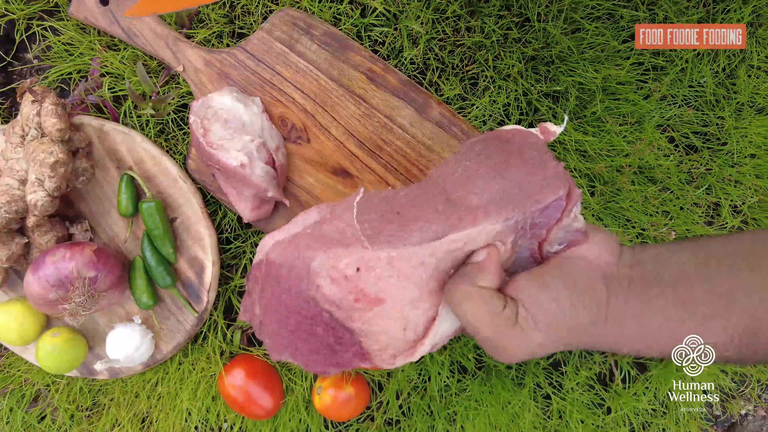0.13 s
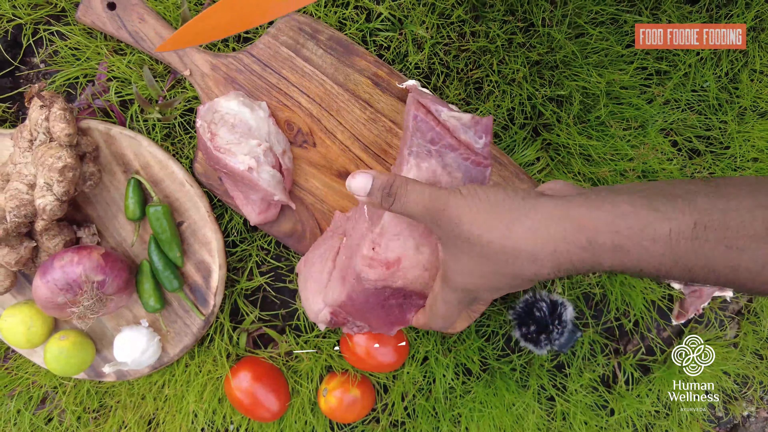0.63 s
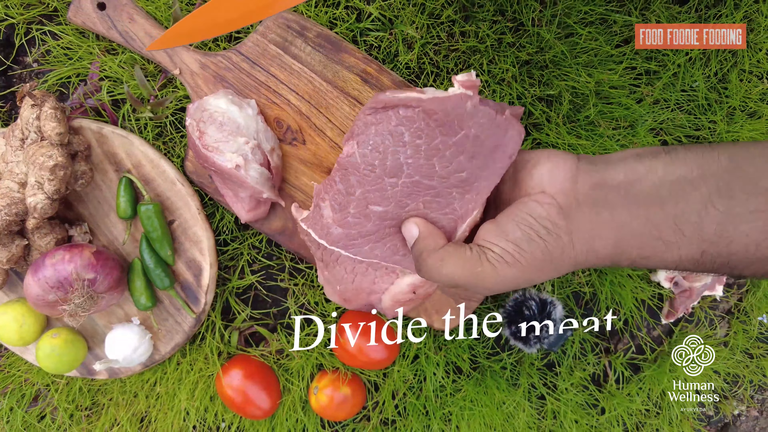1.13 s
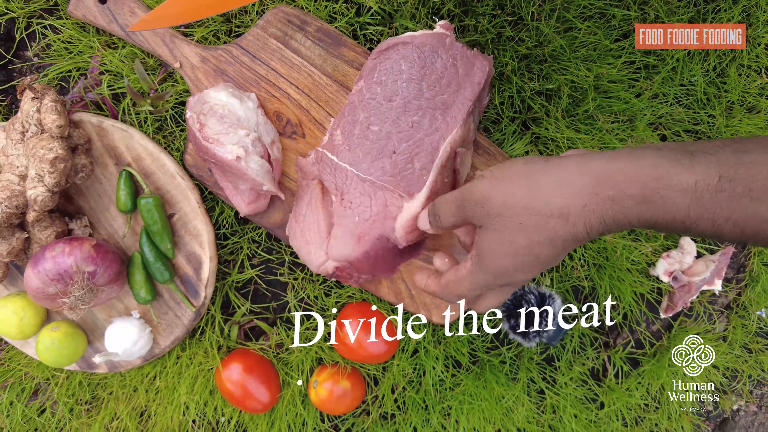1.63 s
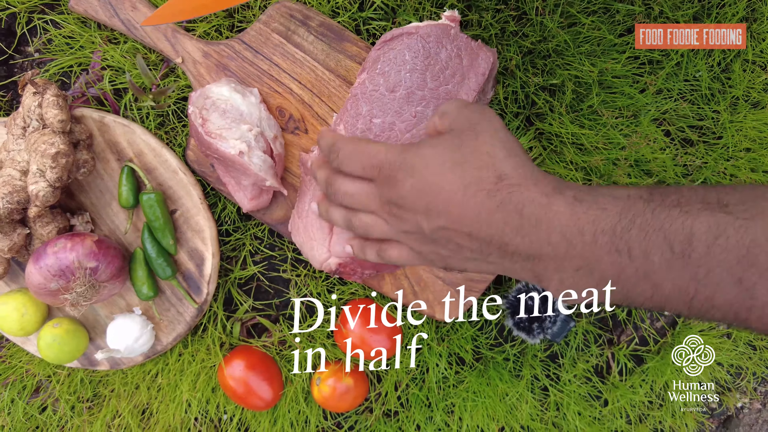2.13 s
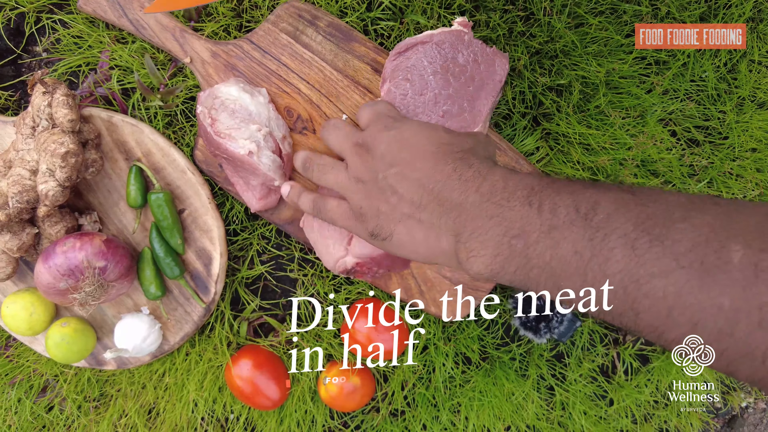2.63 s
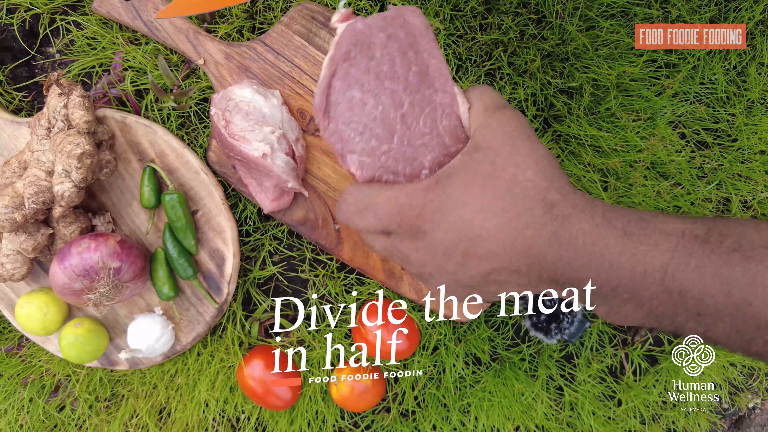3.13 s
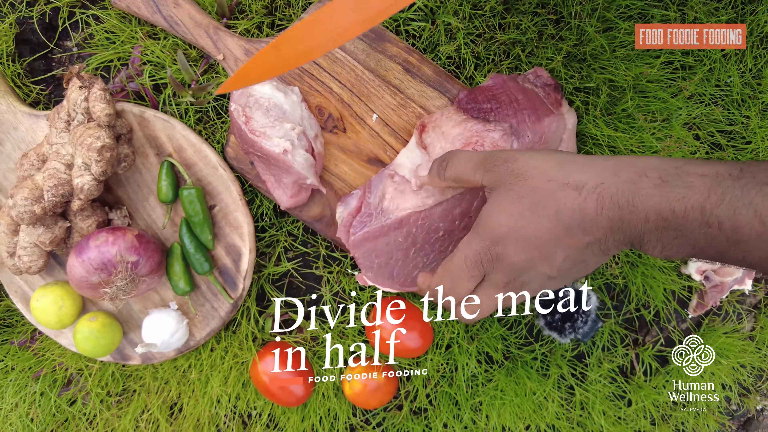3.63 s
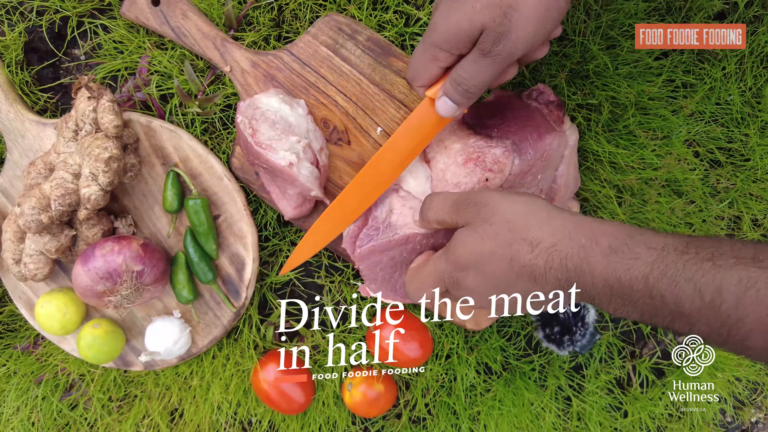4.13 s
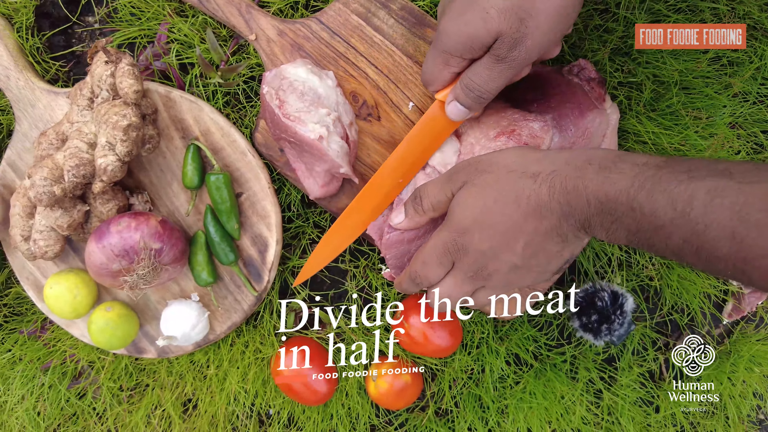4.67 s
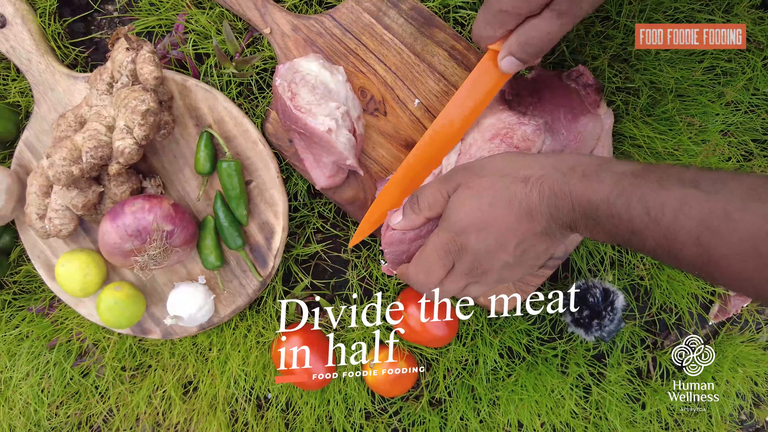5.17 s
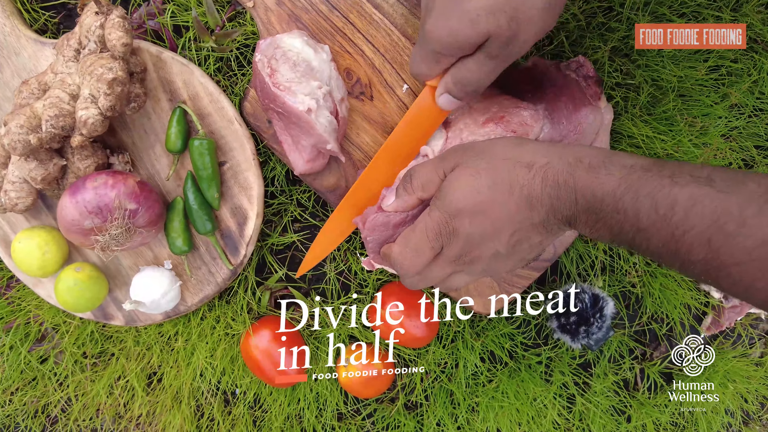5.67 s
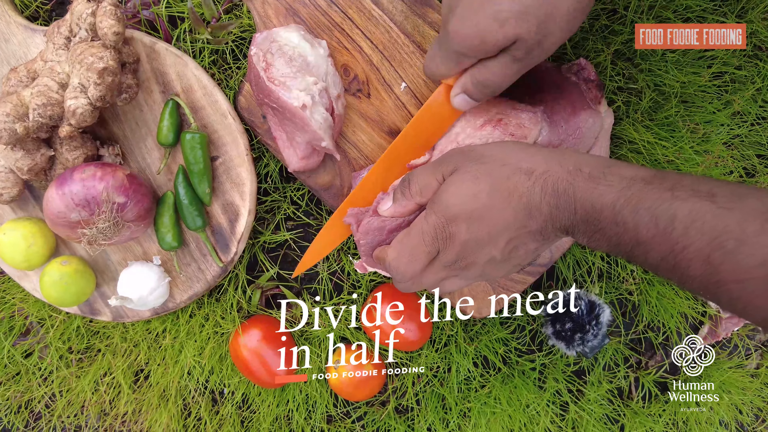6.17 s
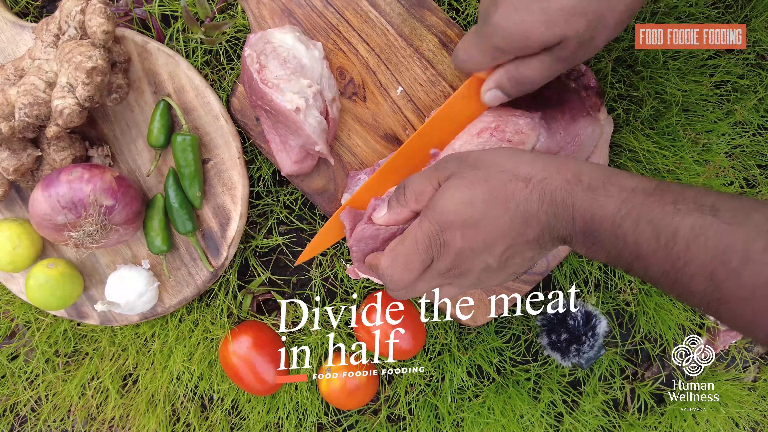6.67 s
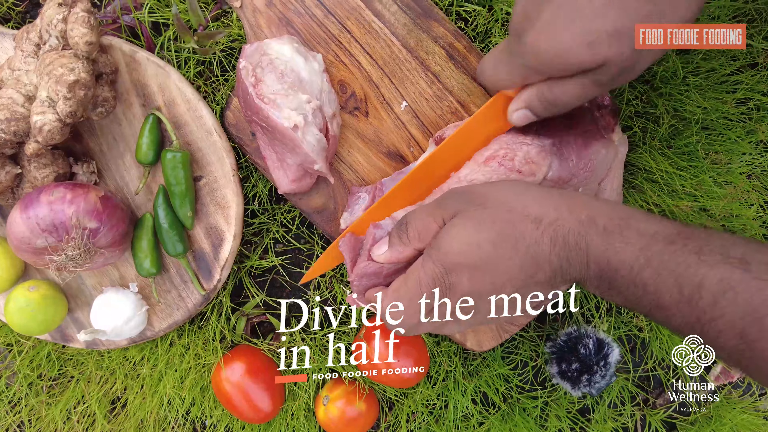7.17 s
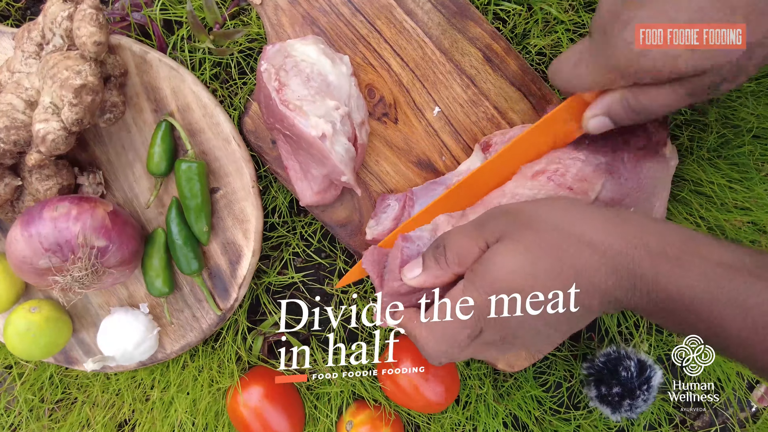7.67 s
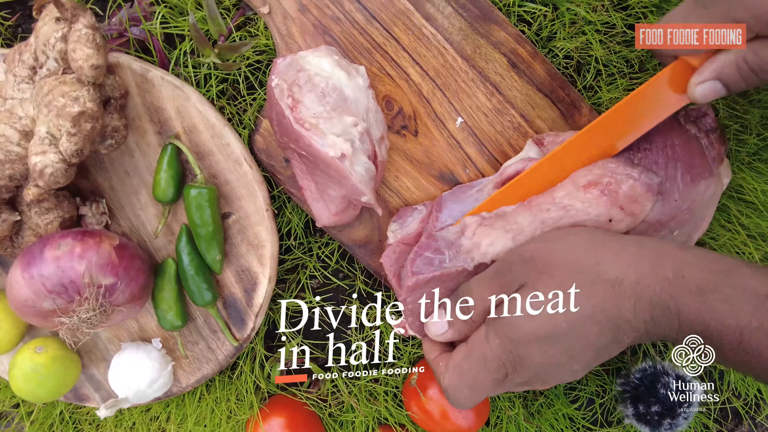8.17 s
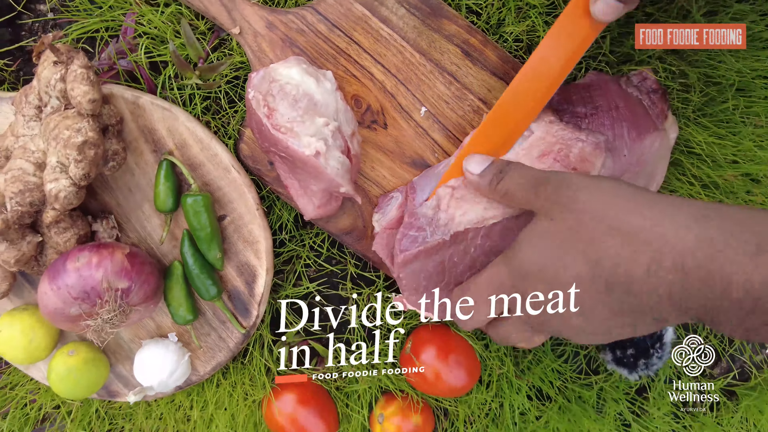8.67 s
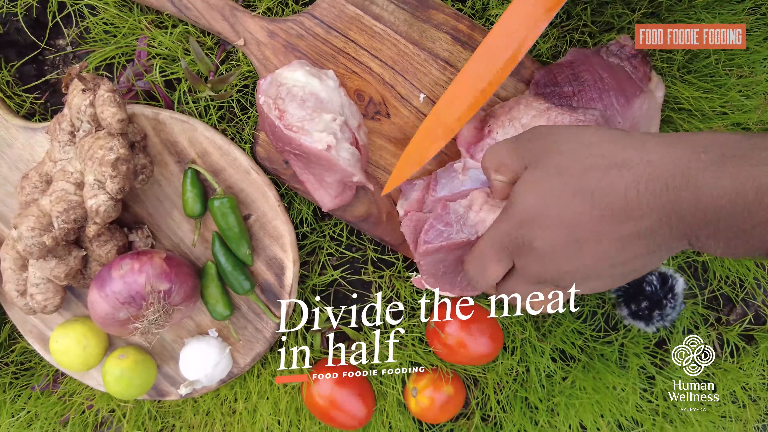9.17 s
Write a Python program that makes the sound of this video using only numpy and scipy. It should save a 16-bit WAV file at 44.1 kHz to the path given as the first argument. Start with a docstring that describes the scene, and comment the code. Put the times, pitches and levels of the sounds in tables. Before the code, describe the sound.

A quiet outdoor place, captured close to the cutting, with a soft high insect hiss and unsteady low rumble. From 0 to 4.3 seconds a knife saws through raw meat on a wooden board: long, thin, bright strokes, gritty and wet, with small ticks and snaps, strongest near 1.5 and 3.2 seconds. A cricket trills in pairs about every 0.9 seconds, each trill a rapid run of short falling tones with a brief echo; faint bird-like calls lie far behind. At 4.3 seconds the scene jumps. The cricket stops, soft knocks touch the board, and a distant engine drones low, rising slightly, with a wavering whine clearest around 7.6. After a lull, sharp crunchy cuts and clicks burst out at 5.8 to 6.2, continue in shorter strokes around 6.5 to 6.9, then cluster from 7.8 to 8.9, loudest near 8.5. Thin insect buzzes appear near 6.9 and after 8.

```python
"""An insect chorus hisses over distant rumble, and a cricket chirps in pairs: falling tones with echoes.
Close by, a knife saws and clicks through raw meat on a wooden board on a lawn: gritty friction noise
and short noise bursts excite shared resonances. The scene then jumps to a later moment: the cricket is
gone, a far engine drones in harmonic orders with a gear whine, and small insects buzz high up."""
import sys
import numpy as np
from scipy import signal
from scipy.fft import rfft, irfft
from scipy.io import wavfile
from scipy.ndimage import uniform_filter1d

SR = 44100
rng = np.random.default_rng(int(sys.argv[2]) if len(sys.argv) > 2 else 0)


def convert_level_to_amplitude(level_db):
    """Map a level in decibels to its linear amplitude factor."""
    exponent = np.asarray(level_db, float) / 20
    return 10 ** exponent


def bounce(signal):
    """Save signal as a 16-bit WAV file at the path given by the first command-line argument."""
    frames = np.transpose(np.atleast_2d(signal))
    limited = np.clip(frames, -1, 1)
    pcm = np.round(limited * 32767).astype(np.int16)
    wavfile.write(sys.argv[1], SR, pcm)


N = 410218
T = np.arange(N) / SR
JUMP_S = 4.281  # the scene jumps to a later moment


def unit(x):
    """Normalization: scale to rms 1."""
    return x / np.sqrt(np.mean(x ** 2))


def shape(x, points):
    """Minimum-phase filtering by (Hz, dB) points; the power of white noise is kept."""
    hz, db = np.transpose(points)
    grid_hz = np.linspace(1, SR / 2, 4097)
    log_gain = np.interp(np.log(grid_hz), np.log(hz), db) * np.log(10) / 20
    # folding the cepstrum onto positive times makes the response causal
    cepstrum = irfft(log_gain)
    cepstrum[1:4096] *= 2
    cepstrum[4097:] = 0
    response = irfft(np.exp(rfft(cepstrum)))
    return signal.fftconvolve(x, response / np.linalg.norm(response))[:N]


def curves(table):
    """Linear interpolation: columns of a table joined by straight lines in time."""
    s, *columns = np.transpose(table)
    return [np.interp(T, s, column) for column in columns]


def walk(rate_hz):
    """Slow random modulation: levels held for 1 / rate, smoothed twice, rms 1."""
    hold = int(SR / rate_hz)
    held = np.repeat(rng.standard_normal(N // hold + 1), hold)
    return unit(uniform_filter1d(uniform_filter1d(held, hold), hold)[:N])


def add(out, s, piece):
    """Superposition: mix a piece in at time s."""
    i = int(s * SR)
    out[i:i + len(piece)] += piece[:N - i]


# low rumble before and after the jump: start_s, deep_level_db, upper_level_db
RUMBLE_LEVELS = [
    [(0.0, -54, -73), (0.13, -50, -57.5), (0.39, -74, -68.5), (0.53, -55, -60), (1.38, -47, -62),
     (1.49, -58, -74), (2.12, -57.5, -58), (2.15, -52, -87), (2.47, -50, -58), (2.53, -57, -82),
     (2.58, -53, -64), (3.65, -51, -61.5), (3.98, -68, -66.5), (4.05, -52.5, -60), (4.14, -61, -72),
     (4.27, -49, -60)],
    [(4.29, -51, -45.5), (4.75, -62, -51), (4.86, -47, -43), (4.93, -38, -40.5), (5.0, -44, -45),
     (5.07, -56, -48.5), (5.35, -44, -42.5), (5.49, -52, -51), (5.77, -34.5, -43.5), (5.91, -39, -46),
     (5.99, -56, -51), (6.47, -59, -53), (6.58, -41, -51.5), (6.83, -60, -52.5), (6.89, -30, -51),
     (6.94, -65, -53), (7.29, -56, -55), (7.36, -50, -48), (7.75, -43, -49.5), (7.95, -38, -50),
     (8.07, -53, -49.5), (8.4, -51, -50.5), (8.87, -51, -50.5), (9.16, -60, -60), (9.27, -46, -55)],
]
# spectra of the deep and the upper rumble: frequency_hz, density_db
DEEP_SPECTRUM = [(12, -40), (22, -8), (40, -2), (58, 9.5), (72, -1), (100, -7), (140, -52)]
UPPER_SPECTRUM = [(50, -27), (85, 2), (130, -7.5), (200, -17.5), (300, -23), (400, -35.5), (600, -63)]


def rumble(later):
    """Band-shaped noise: two low bands whose levels vary independently."""
    before, after = (np.array(curves(part)) for part in RUMBLE_LEVELS)
    deep_db, upper_db = np.where(later, after, before)
    deep_gain = convert_level_to_amplitude(deep_db + 0.93 * walk(8.2))
    upper_gain = convert_level_to_amplitude(upper_db + 1.7 * walk(11.))
    deep = deep_gain * shape(rng.standard_normal(N), DEEP_SPECTRUM)
    upper = upper_gain * shape(rng.standard_normal(N), UPPER_SPECTRUM)
    return deep + upper


# spectra of air, leaves and insect chorus before and after the jump: frequency_hz, density_db
AIR_SPECTRA = ([(76, -21), (130, -3), (190, -10), (670, -19), (1110, -21.5), (2070, -24), (4200, -30.5),
               (5000, -27), (5800, -20.5), (7800, -20), (10400, -21), (11000, -28), (15000, -28),
               (15900, -30)], [(150, -24), (250, -1), (380, -13), (480, -11), (670, -17), (1270, -20),
               (2400, -23), (4300, -29.5), (5300, -26), (5950, -18), (8900, -19), (10500, -23),
               (11100, -28), (15900, -30)])
# level of that hiss before and after the jump: level_db
AIR_LEVELS = -63, -63.5


def air(later):
    """Stationary colored noise: air, leaves and insect chorus merge into one gently swelling hiss."""
    swell = convert_level_to_amplitude(.5 * walk(3.))
    before, after = [swell * convert_level_to_amplitude(level_db) * shape(rng.standard_normal(N), spectrum)
                     for spectrum, level_db in zip(AIR_SPECTRA, AIR_LEVELS)]
    return np.where(later, after, before)


# far engine: start_s, cycle_rate_hz, level_db, odd_orders_db, tilt_db (per order)
ENGINE_CURVES = [(4.29, 20.93, -56.5, -1, -1.5), (4.6, 20.87, -51.5, -3.5, -0.5),
                 (4.85, 20.94, -45, 1.5, -2.5), (5.35, 21.48, -50.5, -5.5, -1.54),
                 (5.6, 21.71, -39.5, -1, -3), (6.1, 22.31, -48, 3, -4), (6.35, 22.85, -45.5, -5, -5.5),
                 (6.6, 22.86, -46, -4.5, -2), (6.85, 23.05, -51, 0.5, -4), (7.15, 23.02, -52, -3.5, -2),
                 (7.35, 23.4, -46.5, -7, -2), (7.6, 23.45, -40, -12, -3), (7.85, 23.84, -44.5, -5.5, -2),
                 (8.1, 23.78, -48.5, -4.5, -3), (8.35, 24.2, -41.5, -13, -3), (8.6, 24.61, -53, -10, -2.5),
                 (8.85, 24.41, -49.5, -6.5, -3), (9.3, 24.27, -54.5, -2.5, -3.5)]
# exhaust color of orders 2 to 12, one value each: level_db
FIRING_COLOR = [0.5, 0.5, 1.5, 1.5, 0, -2, -3.5, 1.5, 0.5, -6, -1.5]


def engine_drone(phase):
    """Harmonic series of uneven firings; turbulent air lets each order swell and drift alone."""
    _, db, odd_db, tilt_db = curves(ENGINE_CURVES)
    drone = np.zeros(N)
    for order, firing_db in enumerate(FIRING_COLOR, 2):
        order_db = db + firing_db + (order % 2) * odd_db + (order - 2) * tilt_db
        order_db = order_db + 0.72 * walk(2.387)
        drift = 0.35 * walk(2.59) + 2 * np.pi * rng.random()
        drone += np.sqrt(2) * convert_level_to_amplitude(order_db) * np.sin(order * phase + drift)
    return drone


# gear whine: start_s, level_db
WHINE_LEVELS = [(4.29, -78), (5.1, -73), (6.4, -77), (7.1, -79), (7.3, -65.5), (7.48, -66), (7.62, -52),
                (7.76, -63.5), (7.84, -69.5), (8.26, -69), (8.33, -63), (8.58, -59.5), (8.68, -69),
                (8.82, -77), (9.0, -66.5), (9.08, -80), (9.3, -71)]


def gear_whine(phase):
    """Gear-mesh tone: a fixed multiple of the engine cycle, wobbling in phase and level."""
    mesh_order = 21.45  # whine cycles per engine cycle
    level_db, = curves(WHINE_LEVELS)
    level_db = level_db + 2.8 * walk(25.) + 1.3 * walk(8.)
    wobble = 1.1 * walk(30.) + 0.37 * walk(200.)
    return np.sin(mesh_order * phase + wobble) * convert_level_to_amplitude(level_db)


def engine():
    """Phase locking: drone and whine follow one engine cycle."""
    cycle_hz = curves(ENGINE_CURVES)[0]
    phase = 2 * np.pi * np.cumsum(cycle_hz) / SR
    return engine_drone(phase) + gear_whine(phase)


# faint sounds: calls of far birds and high insects, and a wide rustle at 1.4 s: start_s, length_s,
# start_pitch_hz, end_pitch_hz, width_hz, level_db
FAR_CALLS = [(0.19, 0.21, 1990, 1940, 197, -68.5), (0.376, 0.11, 1950, 1850, 300, -73),
             (1.4, .25, 3200, 2860, 1210, -69), (2.03, .07, 2550, 2499, 200, -72),
             (2.195, 0.19, 1880, 2690, 152, -73.5), (2.45, 0.064, 1970, 1940, 120, -74),
             (2.45, 0.086, 2150, 2190, 120, -75), (2.713, 0.13, 1260, 1250, 40, -75),
             (5.1, 0.14, 1890, 2010, 402.3, -77), (5.584, 0.14, 2030, 1970, 500, -73),
             (6.853, 0.15, 5300, 5300, 594, -66), (6.95, .22, 5350, 5250, 510, -70),
             (7.979, 0.17, 2340, 2340, 300, -73.5), (8.04, 0.1, 9740, 9700, 600, -66),
             (8.37, 0.11, 9700, 9750, 600.3, -68), (8.68, .13, 9840, 9700, 391.8, -63.5),
             (8.93, .08, 9400, 9500, 500.4, -63.5), (8.956, 0.1, 8986, 8985, 498, -68),
             (9.04, 0.1, 9878, 9750, 600, -64.5), (9.2, 0.13, 8840, 9020, 597, -68)]


def far_calls():
    """Narrow-band modulation: gliding tones whose size and phase flutter as fast as their width."""
    out = np.zeros(N)
    for s, length_s, from_hz, to_hz, width_hz, db in FAR_CALLS:
        n = int(length_s * SR)
        flutter_at = np.arange(n) / SR * width_hz
        in_phase, quadrature = (np.interp(flutter_at, np.arange(300), flutter)
                                for flutter in rng.standard_normal((2, 300)))
        phase = 2 * np.pi * np.cumsum(np.linspace(from_hz, to_hz, n)) / SR
        tone = in_phase * np.sin(phase) + quadrature * np.cos(phase)
        add(out, s, convert_level_to_amplitude(db) * np.hanning(n) ** .5 * tone)
    return out


# cricket chirps, in pairs: first_stroke_middle_s, level_db,
# first_stroke_db and last_stroke_db (both relative to the level)
CRICKET_CHIRPS = [(0.2195, -46, -11, -3), (.3735, -46.5, -2.5, 1.5), (1.1159, -42, -15, -16),
                  (1.2597, -49.5, 0, 2.5), (2.003, -47, -8, -1), (2.1597, -47, -3.5, 1),
                  (2.898, -46.5, -10, 0.5), (3.056, -45, -5, -8), (3.782, -46.5, -9, -1),
                  (3.9360, -46, -4.5, -2.5)]


def cricket():
    """Stridulation: each wing stroke is a short falling tone; strokes swell and fade through a chirp."""
    stroke_gap_s, from_hz, to_hz = .01145, 5570, 4754
    pitch_arch, pitch_sag = 0.019, 0.0065  # share the pitch arches over a chirp and sags to its end
    out = np.zeros(N)
    n = int(0.0088 * SR)  # one stroke
    glide_hz = np.linspace(from_hz, to_hz, n)
    for chirp, (s, db, first_db, last_db) in enumerate(CRICKET_CHIRPS):
        strokes = 8 - chirp % 2  # the second chirp of a pair is one stroke shorter
        for k, (late, size, bend) in enumerate(rng.standard_normal((strokes, 3))):
            arch = pitch_arch * np.sin(np.pi * k / (strokes - 1))
            sag = pitch_sag * k / strokes
            hz = glide_hz * (1 + 0.0072 * bend + arch - sag)
            tone = np.sin(2 * np.pi * np.cumsum(hz) / SR) * np.hanning(n) ** 0.83
            swell_db = first_db * np.exp(-k / 3.1) + last_db * np.exp(k + 1 - strokes) + 0.76 * size
            start_s = s - .0045 + k * stroke_gap_s + 0.00018 * late
            add(out, start_s, tone * convert_level_to_amplitude(db + swell_db))
    return out + nearby_echo(out)


def nearby_echo(x):
    """Diffuse reflection: things nearby return a decaying noise-like echo."""
    lag_s = np.arange(int(.06 * SR)) / SR
    echo = rng.standard_normal(len(lag_s)) * np.exp(-lag_s / .018) * (lag_s > .002)
    return convert_level_to_amplitude(-7.5) * signal.fftconvolve(x, echo / np.linalg.norm(echo))[:N]


# soft knocks and brushes on the board: start_s, level_db, decay_s
BOARD_KNOCKS = [(4.281, -55.5, .0015), (4.331, -59, 0.0024), (4.476, -63, .006), (4.494, -57, .002),
                (5.771, -57, .005), (5.79, -64, 0.024), (6.106, -60, .003), (7.6, -74, 0.041),
                (8.486, -65, 0.0031)]
# resonances of the board: frequency_hz, density_db
BOARD_SPECTRUM = [(150, -10), (400, -8), (1000, -4), (2000, -14), (3200, -3.5), (4500, -13), (6500, -49)]


def board_knocks():
    """Impact excitation: decaying noise bursts ring the wooden board."""
    out, t = np.zeros(N), np.arange(3000) / SR
    for s, db, decay_s in BOARD_KNOCKS:
        add(out, s, convert_level_to_amplitude(db) * rng.standard_normal(len(t)) * np.exp(-t / decay_s))
    return shape(out, BOARD_SPECTRUM)


# strokes of the blade: most_pressure_s, rise_s, fall_s, bright_hiss_db, dull_hiss_db
BLADE_STROKES = [(.40, .25, .11, -57, -65), (.70, 0.16, .18, -57.5, -68), (.96, 0.086, 0.093, -59.5, -68.5),
                 (1.52, 0.39, 0.15, -54, -65.5), (1.72, 0.14, 0.3, -56.5, -66),
                 (1.95, .3, 0.17, -59.5, -78), (2.39, 0.13, 0.17, -58, -66.5), (2.87, .04, .07, -71, -75),
                 (3.27, 0.12, 0.48, -54.5, -66.5), (3.5, 0.36, 0.065, -57, -64.5),
                 (3.78, 0.4, 0.63, -62.5, -65.5), (4.1, 0.15, .4, -69, -72), (4.3, .06, 0.18, -64, -76),
                 (4.48, 0.07, 0.1, -69, -70), (5.77, 0.1, 0.14, -54, -60), (5.9, 0.14, .09, -54.5, -58),
                 (6.13, 0.07, 0.085, -57.5, -61.5), (6.5, 0.088, 0.064, -59, -61.5),
                 (6.56, 0.041, 0.065, -55, -59.5), (6.79, 0.18, 0.091, -65, -64.5),
                 (6.94, 0.13, .08, -62, -66), (7.22, 0.36, 0.13, -69, -67), (7.56, 0.21, 0.29, -64, -63),
                 (7.82, 0.088, 0.085, -55.5, -59), (7.88, .06, 0.078, -59, -67),
                 (7.95, .06, 0.084, -60.5, -63), (8.17, 0.043, 0.065, -61, -63),
                 (8.23, 0.065, .08, -70, -65), (8.33, 0.08, 0.096, -55.5, -59),
                 (8.54, 0.066, .11, -50, -54.5), (8.89, .12, 0.13, -59.5, -62)]


def stroke_levels():
    """Power addition: each stroke climbs to its peak and falls away; overlapping strokes sum in power."""
    drop_db, roundness = 15, 1.49  # fall over the rise or fall time; 1 = pointed top, 2 = rounded
    rest_db = np.array([[-95], [-77]])  # bright, dull: hands and meat rustle between strokes
    power = convert_level_to_amplitude(rest_db) ** 2 * np.ones(N)
    for s, rise_s, fall_s, bright_db, dull_db in BLADE_STROKES:
        near = slice(max(int((s - 3 * rise_s) * SR), 0), int((s + 3 * fall_s) * SR))
        away = np.maximum((s - T[near]) / rise_s, (T[near] - s) / fall_s)
        fall_db = drop_db * away ** roundness
        power[0, near] += convert_level_to_amplitude(bright_db - fall_db) ** 2
        power[1, near] += convert_level_to_amplitude(dull_db - fall_db) ** 2
    return 10 * np.log10(power)


def friction():
    """Stick-slip friction of wet fibers: smooth noise plus dense tiny bursts of unequal size."""
    bursts_per_s, spread_db, smooth, tail_s = 250., 4.5, 1.55, 0.0019
    sizes = (rng.random(N) < bursts_per_s / SR) * convert_level_to_amplitude(spread_db * rng.standard_normal(N))
    gate = signal.lfilter([1], [1, -np.exp(-1 / (tail_s * SR))], sizes)
    grit = unit(rng.standard_normal(N) * (smooth + unit(gate)))
    return grit * convert_level_to_amplitude(2.27 * walk(30.))


def small_snaps(bright_db, dull_db):
    """Poisson process: small snaps at random moments, stronger where the stroke is stronger."""
    snaps_per_s, above_hiss_db, scatter_db = 16, 17.5, 2.5
    snaps = []
    s = rng.exponential(1 / snaps_per_s)
    while s < T[-1]:
        extra_dull, extra_bright = above_hiss_db + scatter_db * rng.exponential(size=2)
        i = int(s * SR)
        snaps.append((s, dull_db[i] + extra_dull, bright_db[i] + extra_bright))
        s += rng.exponential(1 / snaps_per_s)
    return snaps


def snap_burst():
    """Impulsive release: a sharp noise burst of unit energy."""
    t = np.arange(400) / SR
    burst = rng.standard_normal(len(t)) * (1 - np.exp(-t / .0001)) * np.exp(-t / 0.00082)
    return burst / np.linalg.norm(burst)


# loud fiber snaps and blade ticks: start_s, dull_energy_db, bright_energy_db
LOUD_CLICKS = [(.3663, -38, -35), (.622, -37, -34), (0.726, -52, -33), (1.4866, -43, -25),
               (1.5335, -50, -30), (1.6832, -44, -29), (2.8653, -50, -38), (3.1982, -34, -37),
               (3.202, -33, -36), (3.2491, -48, -39), (3.4397, -40, -36), (4.3018, -51, -31),
               (5.7088, -44, -35), (5.7462, -40, -24), (5.7696, -27, -28), (5.7728, -22.5, -18),
               (5.775, -27, -25), (5.7846, -23, -18), (5.811, -33, -32), (5.8137, -34, -23),
               (5.8411, -38, -28), (5.8777, -40, -26), (5.885, -38, -27), (5.9088, -31, -22.5),
               (6.1062, -36, -31), (6.1365, -34, -26), (6.1615, -38, -29), (6.4565, -40, -33),
               (6.4889, -34, -37), (6.5465, -31, -38), (6.556, -35, -31), (6.5844, -35, -31),
               (6.7852, -36, -38), (6.8702, -34, -36), (7.2108, -43, -37), (7.606, -36, -37),
               (7.8205, -27, -44), (7.851, -36, -36), (7.885, -48, -26), (7.925, -40, -32),
               (7.9649, -38, -38), (8.1624, -34, -27), (8.1771, -28, -33), (8.3146, -31, -40),
               (8.345, -32, -32), (8.486, -36, -27), (8.5292, -30, -18), (8.531, -35, -33),
               (8.543, -31, -27), (8.55, -34, -26), (8.572, -36, -37), (8.8431, -29.5, -32),
               (8.893, -34, -41), (8.8982, -29.5, -27.5), (8.9079, -35, -31), (8.9153, -40, -32),
               (8.9279, -36, -35)]
# resonances of blade and meat, dull and bright: frequency_hz, density_db
DULL_SPECTRUM = [(3000, -30.5), (4300, -19.5), (5500, -6), (6300, -4.5), (7600, -1), (9000, -10),
                 (10500, -29.5)]
BRIGHT_SPECTRUM = [(7500, -29), (9000, -8), (10600, -3.5), (12200, -7.5), (14900, -3), (15700, -9.5),
                   (17000, -16.5)]
# spectra of the scrape on wood and of the crunch: frequency_hz, density_db
WOOD_SPECTRUM = [(3000, -35), (4100, -18), (4700, -4.5), (5300, -1), (6200, -1.5), (8000, -28.5)]
CRUNCH_SPECTRUM = [(1500, -19), (2500, -30), (3200, 8), (4000, -1.5), (4800, -27), (6000, -46)]


def knife(later):
    """Source-filter principle: the blade hisses through fibers and snaps them; both ring the same resonances."""
    scrape_db, wood_snap_db = -4.5, -6  # scrape re dull hiss; wooden part of a snap re its dull part
    crunch_db, firm_db, crunch_slope = -75, -54.5, 2.2  # level at a firm bright hiss; dB per dB of it
    bright_db, dull_db = stroke_levels()
    rub_dull, rub_bright, rub_wood = friction(), friction(), friction()

    dull = rub_dull * convert_level_to_amplitude(dull_db)
    bright = (.5 * rub_dull + 0.48 * rub_bright) * convert_level_to_amplitude(bright_db)
    wood = rub_wood * convert_level_to_amplitude(dull_db + scrape_db)
    crunch = later * rub_wood * convert_level_to_amplitude(crunch_db + crunch_slope * (bright_db - firm_db))

    for s, dull_snap_db, bright_snap_db in LOUD_CLICKS + small_snaps(bright_db, dull_db):
        burst = snap_burst()
        add(wood, s, burst * convert_level_to_amplitude(dull_snap_db + wood_snap_db))
        add(dull, s, burst * convert_level_to_amplitude(dull_snap_db))
        add(bright, s, burst * convert_level_to_amplitude(bright_snap_db))

    # scrape on wood and crunch sound only after the jump
    on_board = shape(later * wood, WOOD_SPECTRUM) + shape(crunch, CRUNCH_SPECTRUM)
    return on_board + shape(dull, DULL_SPECTRUM) + shape(bright, BRIGHT_SPECTRUM)


def scene():
    """Superposition of all sources; the engine is heard only after the jump."""
    later = T >= JUMP_S
    surroundings = rumble(later) + air(later) + later * engine() + far_calls() + cricket()
    return (surroundings + board_knocks() + knife(later))[None]


def top_cut(x):
    """Nothing passes above about 16.5 kHz."""
    return signal.sosfilt(signal.butter(12, 16470, fs=SR, output="sos"), x)


def record(dry):
    """Band limitation: a steep elliptic low-pass cuts the top."""
    low_pass = signal.ellip(10, .2, 60, 15500, fs=SR, output="sos")  # ripple 0.2 dB, stopband 60 dB
    mix = signal.sosfilt(low_pass, dry)
    return top_cut(mix)


dry = scene()
out = record(dry)
bounce(out)
```